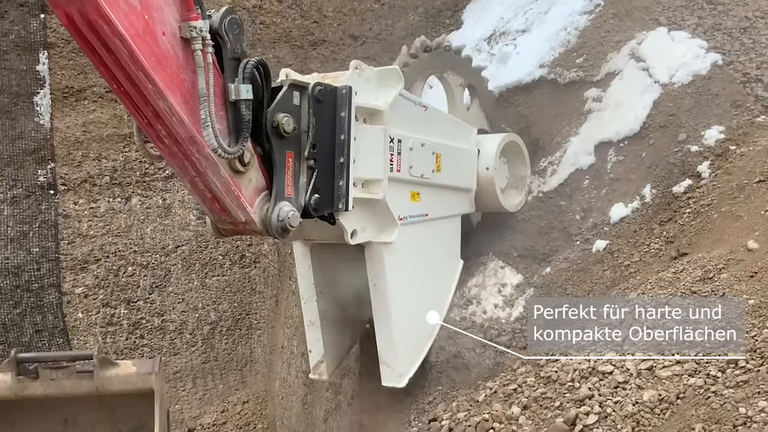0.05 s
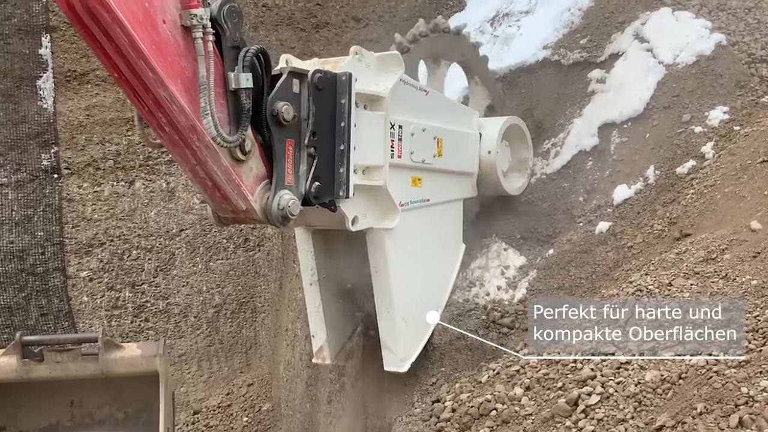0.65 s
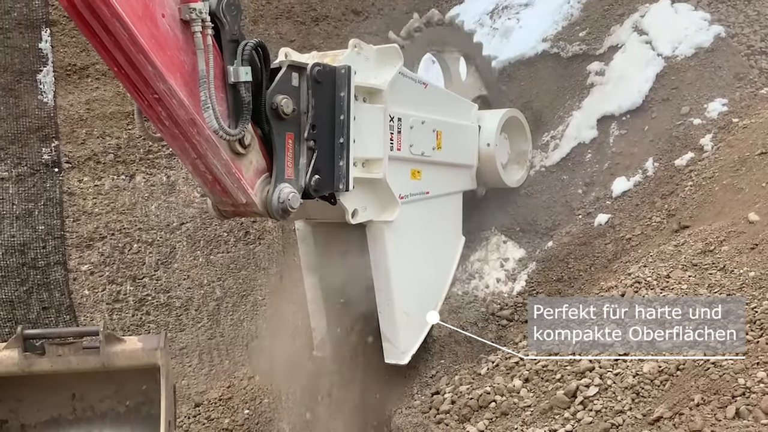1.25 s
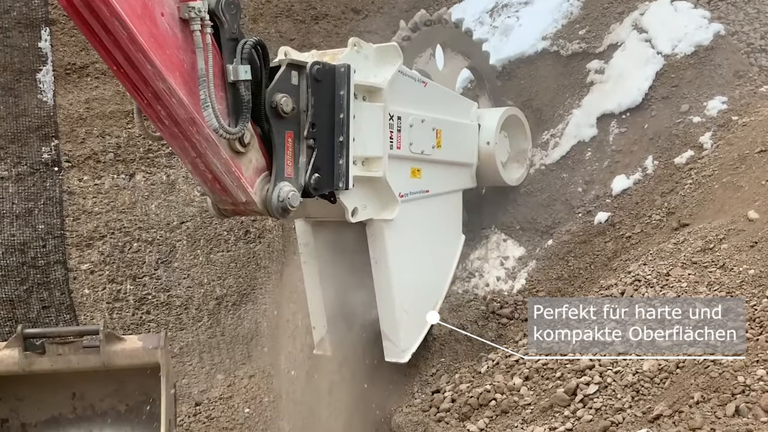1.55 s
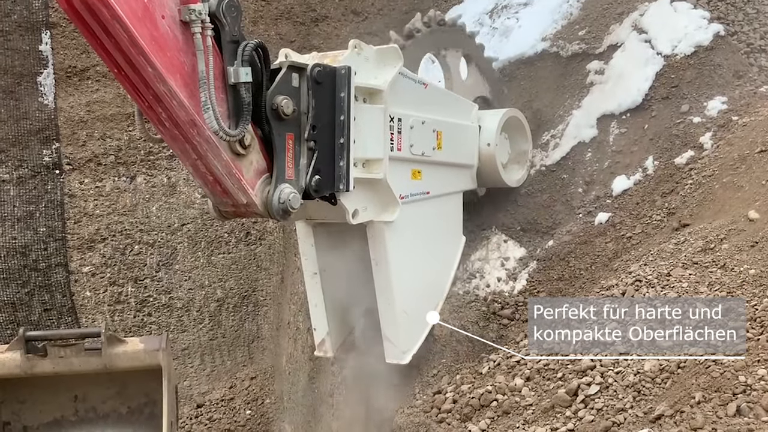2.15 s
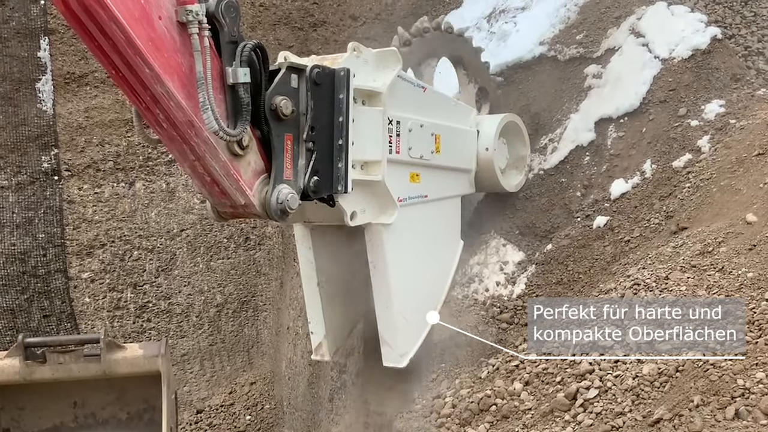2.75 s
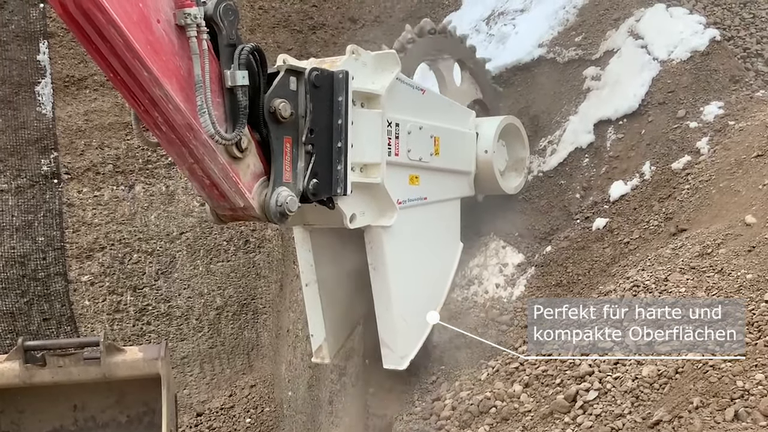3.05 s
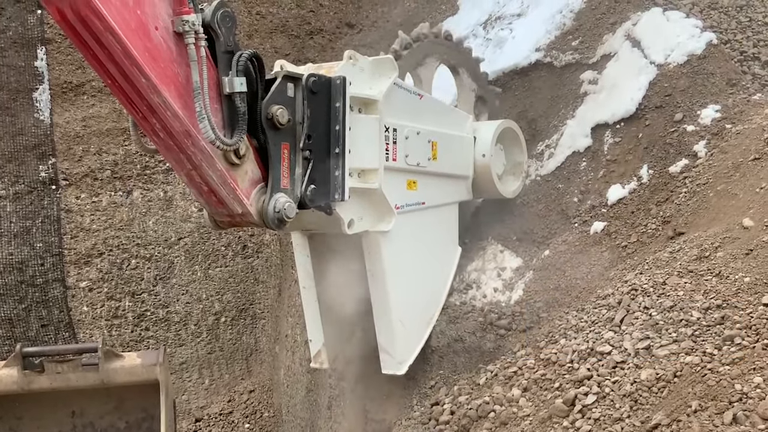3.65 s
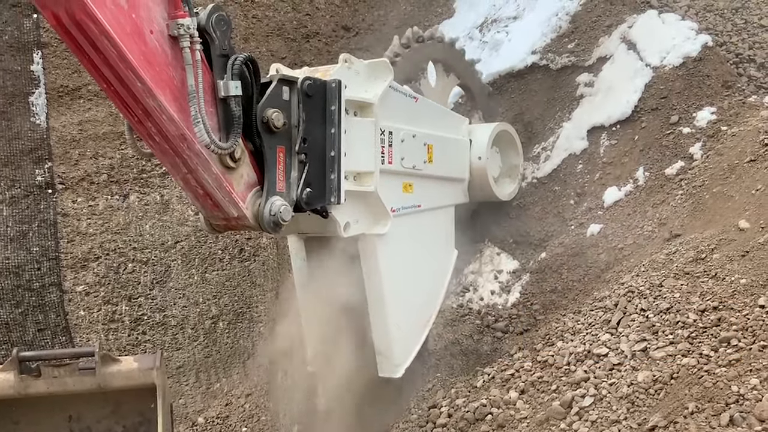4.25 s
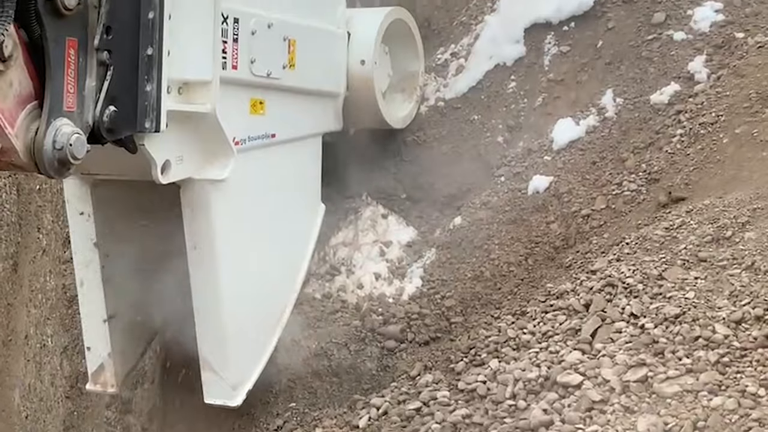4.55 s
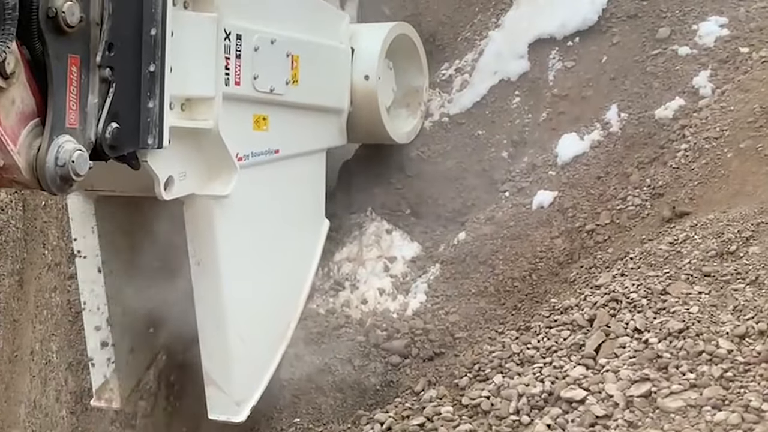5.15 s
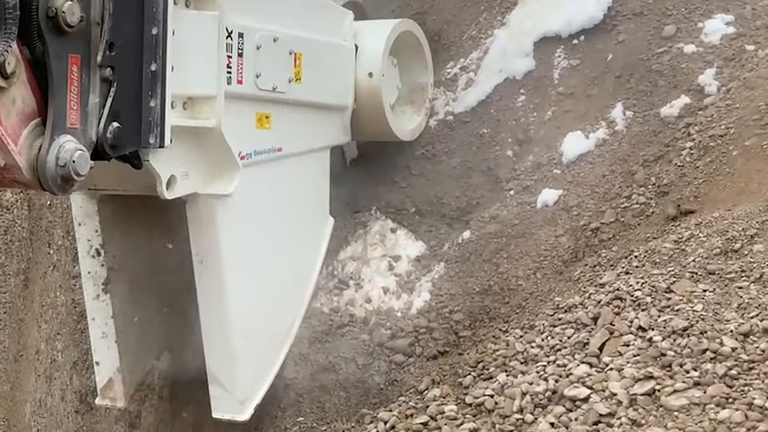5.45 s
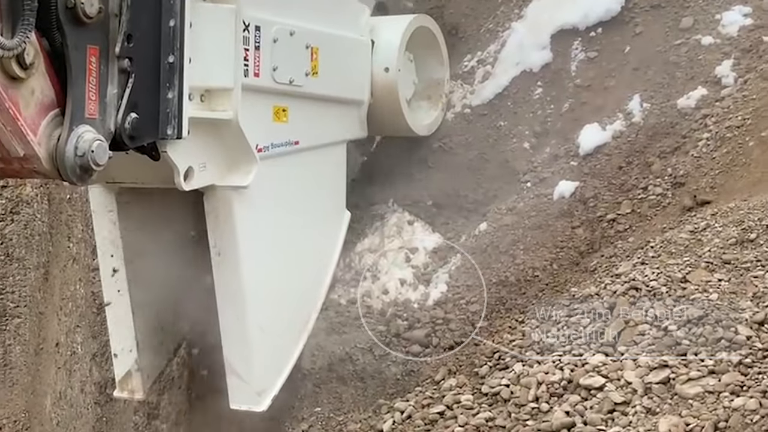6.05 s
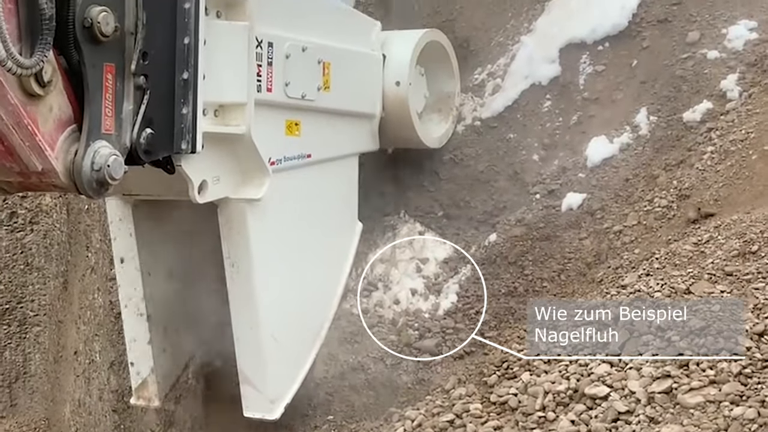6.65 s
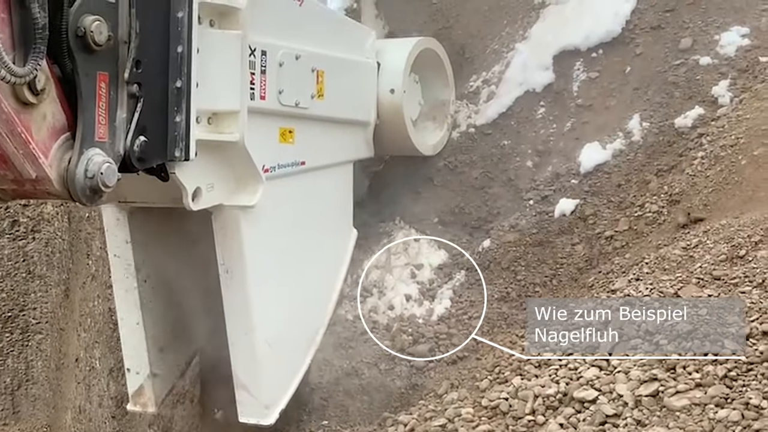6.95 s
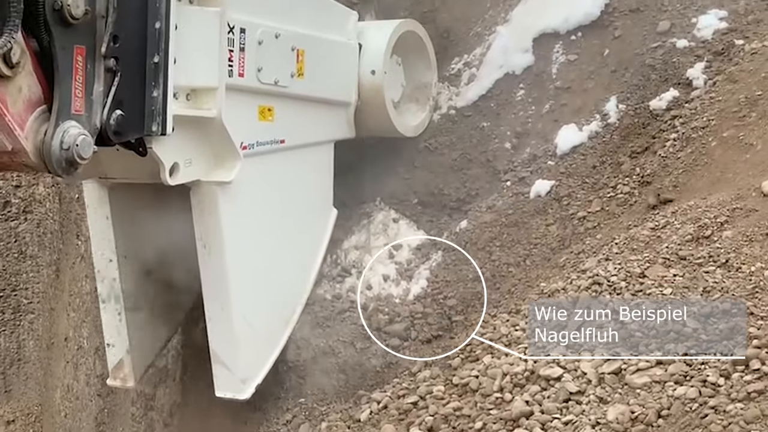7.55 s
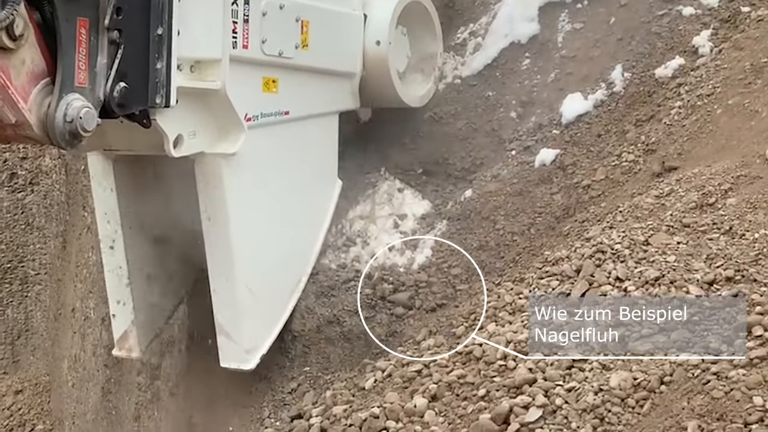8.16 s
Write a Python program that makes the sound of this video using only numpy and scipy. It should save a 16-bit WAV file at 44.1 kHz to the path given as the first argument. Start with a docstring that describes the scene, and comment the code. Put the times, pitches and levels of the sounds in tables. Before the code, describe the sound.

Rock crunches and crackles in quick, uneven bursts as a toothed steel wheel cuts into the ground a few metres away in the open air. Loose stones knock against the wheel, and a jammed one occasionally gives a very brief, hoarse squeak. A steady hydraulic hum and a low rumble run throughout, with a deep chattering drone that swells whenever the machine strains and fades as the load lightens.

```python
"""Rock wheel cutting a slot

An excavator's rock wheel grinds through hard, stony ground, its picks biting six to ten times a second.
Each fracture crackles, rings the picks, clanks in the wheel and shakes the steel housing.
Under load the arm chatters in a deep drone; the hydraulic drive hums; the gravel slope scatters sound."""
import sys
import numpy as np
from scipy import signal
from scipy.fft import rfft, irfft, next_fast_len
from scipy.io import wavfile
from scipy.ndimage import uniform_filter1d, map_coordinates

SR = 44100
rng = np.random.default_rng(int(sys.argv[2]) if len(sys.argv) > 2 else 0)


def unload_audio(sound):
    """Save the sound as a 16-bit wav file, at the path given as the first command line argument."""
    columns = np.transpose(np.atleast_2d(sound))
    # keep every value between -1 and 1, then stretch to whole-number steps
    steps = np.round(np.clip(columns, -1, 1) * 32767)
    wavfile.write(sys.argv[1], SR, steps.astype(np.int16))


N = 370440

# picks biting stones: (start [s], length [s], crackle [dB], force on the wheel [dB])
BITES = [(0.089, 0.074, -32.5, -24.5), (0.293, 0.043, -27, -21), (0.381, 0.062, -29.5, -20),
         (0.486, 0.039, -30.5, -33), (0.631, 0.035, -29, -17.5), (0.739, 0.16, -33.5, -30),
         (0.916, 0.074, -32.5, -27.5), (1.067, 0.089, -35, -28.5), (1.171, 0.18, -36.5, -45),
         (1.385, 0.15, -37, -32), (1.538, 0.065, -33.5, -32.5), (1.734, 0.21, -33.5, -29),
         (1.926, 0.087, -29.5, -28), (2.082, 0.16, -33, -26.0), (2.251, 0.068, -32, -25.5),
         (2.324, 0.069, -30, -22), (2.447, 0.103, -30.5, -21.5), (2.526, 0.18, -30, -26.5),
         (2.618, 0.16, -29, -24.0), (2.725, 0.036, -28, -25), (2.819, 0.096, -27.5, -21),
         (2.923, 0.04, -29.5, -20), (3.021, 0.061, -29.5, -20), (3.115, 0.039, -27, -20.5),
         (3.226, 0.043, -26.5, -20.5), (3.324, 0.031, -25, -18), (3.421, 0.032, -22, -17.5),
         (3.503, 0.04, -28, -20.5), (3.578, 0.063, -28, -22.5), (3.676, 0.041, -27.5, -20.5),
         (3.748, 0.067, -28.5, -23), (3.866, 0.034, -30.5, -21), (3.946, 0.051, -29, -22.5),
         (4.041, 0.056, -29.5, -20.5), (4.139, 0.041, -30.5, -22.5), (4.248, 0.082, -29, -22),
         (4.337, 0.052, -27, -20.5), (4.433, 0.054, -28, -19.5), (4.524, 0.025, -32, -23),
         (4.576, 0.14, -32, -25), (4.759, 0.044, -35, -25.5), (4.887, 0.11, -31, -22.5),
         (5.063, 0.06, -30.5, -25), (5.124, 0.049, -28, -23), (5.268, 0.057, -30, -25.5),
         (5.447, 0.085, -30.5, -23.5), (5.619, 0.11, -32, -27), (5.796, 0.068, -31, -25.5),
         (5.945, 0.073, -27.5, -21), (6.108, 0.06, -30.5, -24.5), (6.58, 0.063, -39, -29.5),
         (6.745, 0.11, -33, -35), (6.942, 0.14, -30, -29), (7.37, 0.069, -34, -25.5),
         (7.483, 0.122, -44, -29.5), (7.561, 0.095, -29, -21.5), (7.649, 0.16, -34.5, -27.5),
         (7.763, 0.083, -30, -22.5), (7.858, 0.12, -33.5, -25), (7.961, 0.052, -26.5, -20),
         (8.052, 0.085, -29.5, -20.0), (8.156, 0.048, -30.5, -29), (8.289, 0.054, -30, -20)]
# pick modes: (frequency [Hz], width [Hz], lift [dB])
PICK_MODES = [(2780, 130, 6), (4060, 220, 3), (6560, 240, 9), (11120, 240, 11), (14280, 280, 11),
              (14930, 250, 7)]
# spectrum of breaking rock: (frequency [Hz], relative level [dB])
ROCK_COLOUR = [(400, -17), (1500, -10.5), (2500, 3.5), (3300, -2), (4400, 2.5), (6000, -5.5), (8000, -8.5),
               (10500, -17), (13000, -29)]


def amp(db):
    """Decibels to gain."""
    return 10 ** (np.asarray(db) / 20)


def unit(x):
    """x at rms 1."""
    return x / np.sqrt(np.mean(x ** 2) + 1e-20)


def along(points, hz):
    """Interpolate (frequency [Hz], value) points on a log axis."""
    knots_hz, values = np.transpose(points)
    return np.interp(np.log(hz + 1), np.log(knots_hz + 1), values)


def wobble(rate_hz):
    """Smooth random curve, rate_hz knots a second."""
    knots = rng.standard_normal(int(N * rate_hz / SR) + 4)
    return map_coordinates(knots, [np.arange(N) * rate_hz / SR])


def filtered(x, response):
    """x through a complex frequency response."""
    size = 2 * next_fast_len(N // 2 + SR // 2, real=True)
    return irfft(rfft(x, size) * response(np.fft.rfftfreq(size, 1 / SR)), size)[..., :N]


def high_passed(x, corner_hz):
    """Second-order high-pass."""
    return filtered(x, lambda hz: (1j * hz / (corner_hz + 1j * hz)) ** 2)


def body(colour, modes):
    """Causal response of a body with broad colour and resonant modes; keeps white-noise power."""
    def response(hz):
        peaks = sum((amp(2 * db) - 1) / (1 + (2 * (hz - centre_hz) / width_hz) ** 2)
                    for centre_hz, width_hz, db in modes)
        gain = unit(amp(along(colour, hz)) * np.sqrt(np.abs(1 + peaks)))
        cepstrum = irfft(np.log(gain + 1e-6))
        half = len(cepstrum) // 2
        cepstrum[1:half] *= 2  # fold to minimum phase
        cepstrum[half + 1:] = 0
        return np.exp(rfft(cepstrum))
    return response


def fractures(rate_hz, spread_db):
    """Tiny random impulses; rows: direct, scattered by the slope."""
    happens = rng.random((2, N)) < rate_hz / SR
    return unit(happens * rng.choice([-1, 1], (2, N)) * amp(spread_db * rng.standard_normal((2, N))))


def rings(rate_hz, centre_hz, spread_hz, decay_s):
    """Random strikes, each ringing at its own pitch; rows: direct, scattered."""
    t = np.arange(int(5 * decay_s * SR)) / SR
    rows = []
    for strikes in fractures(rate_hz, spread_db=0.5):
        onsets = np.flatnonzero(strikes)[:, None]
        hz = centre_hz + spread_hz * rng.standard_normal(N)[onsets]
        waves = strikes[onsets] * np.sin(2 * np.pi * hz * t) * np.exp(-t / decay_s)
        samples = onsets + np.arange(len(t))
        rows.append(np.bincount(samples.ravel(), waves.ravel(), N)[:N])
    return unit(np.array(rows))


def stereo(direct, scattered):
    """Each side has its own level and delay; the slope's scatter reaches the two in antiphase."""
    # (frequency [Hz], left over right [dB])
    balance = [(100, 0), (260, 0), (400, 2), (520, 10), (700, 9), (790, 16), (900, 4), (2700, 0)]
    # (frequency [Hz], phase lead of the left [rad])
    lead = [(150, .1), (450, 1.2), (740, 1.3), (820, -.5), (1100, .3), (1700, -.1), (2620, -2.92),
            (2930, -3.2), (3750, -5.55), (9000, -6.28)]
    # (frequency [Hz], left-right coherence [0-1])
    coherence = [(150, .998), (420, .94), (560, .55), (1200, .91), (1950, .8), (2650, .995), (2950, .999),
                 (4000, .9), (9000, .96)]
    side = np.array([[1], [-1]])
    mix_rad = lambda hz: np.arccos(np.clip(along(coherence, hz), -1, 1)) / 2
    path = lambda hz: amp(side * along(balance, hz) / 2) * np.exp(.5j * (side - 1) * along(lead, hz))
    common = filtered(direct, lambda hz: path(hz) * np.cos(mix_rad(hz)))
    return common + side * filtered(scattered, lambda hz: path(hz) * np.sin(mix_rad(hz)))


def hydraulic_drive(pitch_hz, wander_hz, flutter_db):
    """The drive hums; its speed and partials waver."""
    # partials: (harmonic number, level [dB])
    partials = [(2, -37), (3, -42), (4, -41), (5, -40)]
    phase = 2 * np.pi * np.cumsum(pitch_hz + wander_hz * wobble(18)) / SR
    return sum(amp(db) * unit(np.sin(k * phase) * amp(flutter_db * wobble(16))) for k, db in partials)


def arm_chatter(strain, pitch_hz, wander_hz, flutter_db, gain_db, rise_s, release_s):
    """The wheel's stick-slip swings the arm in its main mode: slightly with strain, more in bouts."""
    # chatter bouts: (start [s], length [s], relative level [dB])
    bouts = [(0.0, 0.29, -13.5), (0.466, 0.19, -12), (2.078, 0.13, -14.5), (2.297, 0.098, -9),
             (2.472, 0.37, -11), (3.44, 0.2, -9), (3.658, 0.13, -14), (3.885, 0.1, -9.5), (4.087, 0.4, -9),
             (4.54, 0.2, -19), (4.793, 0.14, -13.5), (5.304, 0.045, -16), (5.483, 0.04, -13),
             (6.304, 0.02, -9.5), (7.15, 0.326, -15), (7.583, 0.36, -14), (8.115, 0.18, -12.5)]
    t = np.arange(N) / SR
    swing = amp(-19) * (strain / strain.max()) ** 2.17
    for start_s, length_s, db in bouts:
        age_s = np.maximum(t - start_s, 0)
        fade = np.exp(-np.maximum(age_s - length_s, 0) / release_s)
        swing = np.maximum(swing, amp(db) * (1 - np.exp(-age_s / rise_s)) * fade)
    phase = 2 * np.pi * np.cumsum(pitch_hz + wander_hz * wobble(16)) / SR
    return swing * amp(gain_db + flutter_db * wobble(45)) * unit(np.sin(phase))


def jammed_stones(judder_rad):
    """A jammed stone rubs the wheel, which sings hoarsely for a moment."""
    # jams: (peak time [s], half length [s], pitch [Hz], level [dB])
    jams = [(0.65, 0.022, 500, -16.5), (1.155, 0.011, 720, -18), (4.544, 0.0051, 645, -13),
            (5.152, 0.0082, 687, -14), (5.832, 0.028, 852, -19.5)]
    t = np.arange(N) / SR
    judder = judder_rad * wobble(180)
    return sum(amp(db) * np.exp(-((t - peak_s) / half_s) ** 2) * np.sin(2 * np.pi * hz * t + judder)
               for peak_s, half_s, hz, db in jams)


def steel_ring(x, t60_s, ring_db):
    """x plus the brief ring of the steel plates' dense modes."""
    t = np.arange(SR // 3) / SR
    tail = rng.standard_normal((2, len(t))) * amp(-60 * t / t60_s)
    ring = signal.fftconvolve(x, tail / np.linalg.norm(tail[0]), axes=1)[:, :N]
    return x + amp(ring_db) * filtered(ring, lambda hz: 1 / (1 + 1j * hz / 3000) ** 2)


def snap_envelope(decay_s):
    """Stones split: instant onset, fast decay."""
    # snaps: (time [s], relative level [dB])
    snaps = [(1.386, -40), (4.445, -33), (5.947, -31)]
    t = np.arange(N) / SR
    return sum(amp(db) * (t >= at_s) * np.exp(-np.abs(t - at_s) / decay_s) for at_s, db in snaps)


def bite_envelope(levels_db, sag_db_per_s, rise_s, release_s):
    """Each bite sets in fast, sags as the pick crosses the stone, and dies away."""
    power, t = np.zeros(N + SR), np.arange(SR // 2) / SR
    for (start_s, length_s, _, _), db in zip(BITES, levels_db):
        shape = (1 - np.exp(-t / rise_s)) * np.exp(-np.maximum(t - length_s, 0) / release_s)
        power[round(start_s * SR):][:len(t)] += (amp(db - sag_db_per_s * t) * shape) ** 2
    return np.sqrt(power[:N])


def ground_contact(slack_db, slack_s):
    """Contact slackens just before each pick lands, and in hollows."""
    # hollows in the ground: (time [s], half length [s], drop [dB])
    hollows = [(1.366, 0.018, 0.5), (4.568, 0.013, 9), (5.92, 0.021, 0.5)]
    t = np.arange(N) / SR
    slack = sum((t < start_s) * np.exp(-np.abs(start_s - t) / slack_s) for start_s, *_ in BITES)
    drop_db = sum(db * np.exp(-((t - at_s) / half_s) ** 2) for at_s, half_s, db in hollows)
    return amp(-slack_db * slack - drop_db)


def housing_thud(contact, load_db, strain, force, spurts_db):
    """Fractures shake the housing: a rumble under load and strain, a jolt at each bite."""
    # housing modes: (frequency [Hz], width [Hz], lift [dB])
    modes = [(77.6, 23, 5.5), (105, 23, 12), (134.5, 17, 8), (168.8, 8.7, 13.5), (222.5, 42, 7),
             (323, 19.2, 12), (368.2, 13, 13.5), (401, 5.7, 7.5), (436.6, 4.4, 14), (495, 17, 7)]
    # housing spectrum: (frequency [Hz], relative level [dB])
    colour = [(25, -25), (45, -13), (62, 4), (150, 0.5), (270, -1.5), (470, -1.5), (800, -18), (3000, -50)]
    rumble = np.hypot(amp(-21 + 0.86 * load_db), amp(-2.5) * strain)
    rumble = rumble * fractures(rate_hz=2500, spread_db=3)
    jolts = high_passed(amp(3) * force * fractures(rate_hz=2500, spread_db=2), corner_hz=94.5)
    shaking = contact * (rumble + jolts) * unit(amp(spurts_db + 1.6 * wobble(25)))
    return filtered(shaking, body(colour, modes))


def wheel_clank(envelope, spurts_db):
    """Fractures and loose stones knock on the steel wheel."""
    # wheel modes: (frequency [Hz], width [Hz], lift [dB])
    modes = [(653, 37.5, 9.5), (800, 74, 5), (873, 15, 8), (1053, 26, 5.5), (1204, 61, 5), (1487, 66, 3.5),
             (1768, 56, 3.5)]
    # wheel spectrum: (frequency [Hz], relative level [dB])
    colour = [(200, -27.5), (560, -1.5), (1200, -0.5), (1800, -5), (2300, -9.5), (3200, -13), (6000, -32.5)]
    stones = amp(-16) * rings(rate_hz=130, centre_hz=1299.6, spread_hz=697, decay_s=0.0083)
    impacts = amp(-0.95) * unit(amp(0.32 * spurts_db)) * fractures(rate_hz=4500, spread_db=2.5)
    return filtered(envelope * (impacts + stones), body(colour, modes))


def rock_crackle(envelope, spurts_db):
    """Rock crackles at the picks, coloured by their modes."""
    flicker = unit(amp(0.78 * spurts_db + 0.78 * wobble(60)))
    breaking = envelope * flicker * fractures(rate_hz=5500, spread_db=0)
    return filtered(breaking, body(ROCK_COLOUR, PICK_MODES))


def pick_pings(envelope, rate_per_mode_hz, detune_widths, decay_s, db_per_octave):
    """Hard grains ring the picks' upper modes; no two picks are tuned alike."""
    flare = (envelope / envelope.max()) ** 0.48 * unit(amp(2.7 * wobble(18)))
    pings = 0
    for hz, width_hz, lift_db in PICK_MODES[2:]:
        gain = amp(along(ROCK_COLOUR, hz) + lift_db + db_per_octave * np.log2(hz))
        pings += gain * rings(rate_per_mode_hz, hz, detune_widths * width_hz, decay_s)
    return envelope * flare * amp(-11) * unit(pings)


def cutter(force, cracks, strain):
    """Rock breaks in spurts; scraping, bites and snaps add in power. Rows: direct, scattered."""
    # scraping between bites: (time [s], load [dB])
    load = [(0.45, 1), (0.8, -1.5), (1.35, -8), (1.7, -6.5), (2.1, -2), (2.7, -5.5), (3.6, -0.5),
            (4.4, -4.5), (4.75, -3.5), (5.35, -9), (6.25, -4.5), (7.0, -0.5), (7.65, -1.5), (8.4, -0.5)]
    load_db = np.interp(np.arange(N) / SR, *np.transpose(load))
    contact = ground_contact(slack_db=2.5, slack_s=0.02)
    spurts_db = wobble(150)
    snaps = snap_envelope(decay_s=0.0097)
    clank = contact * np.sqrt(amp(-24.5 + load_db) ** 2 + force ** 2 + (amp(4) * snaps) ** 2)
    crackle = contact * np.sqrt(amp(-33.5 + 0.91 * load_db) ** 2 + cracks ** 2 + snaps ** 2)
    return (housing_thud(contact, load_db, strain, force, spurts_db)
            + wheel_clank(clank, spurts_db)
            + rock_crackle(crackle, spurts_db)
            + pick_pings(crackle, rate_per_mode_hz=110, detune_widths=0.22, decay_s=0.0047,
                         db_per_octave=7.5))


def scene():
    """The whole machine from a few metres."""
    _, _, crack_db, force_db = np.transpose(BITES)
    force = bite_envelope(force_db, sag_db_per_s=3.5, rise_s=0.0063, release_s=0.041)
    cracks = bite_envelope(crack_db, sag_db_per_s=43, rise_s=0.0039, release_s=0.028)
    strain = np.sqrt(np.abs(uniform_filter1d(force ** 2, int(0.46 * SR))))  # running rms force
    direct, scattered = steel_ring(cutter(force, cracks, strain), t60_s=0.2, ring_db=-15)
    chatter = arm_chatter(strain, pitch_hz=98.65, wander_hz=3.24, flutter_db=0.66, gain_db=-4,
                          rise_s=0.009, release_s=0.032)
    hum = hydraulic_drive(pitch_hz=162.14, wander_hz=2.2, flutter_db=2.5)
    return stereo(direct + chatter + hum + jammed_stones(judder_rad=0.45), scattered)


def record(dry):
    """Soft peak limit, then band limit."""
    ceiling, top_hz = 0.92, 15720
    rounded = dry / (1 + (dry / ceiling) ** 8) ** (1 / 8)
    return filtered(rounded, lambda hz: hz < top_hz)


dry = scene()
out = record(dry)
unload_audio(out)
```